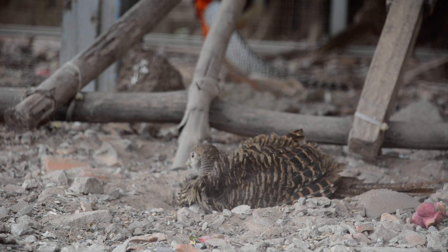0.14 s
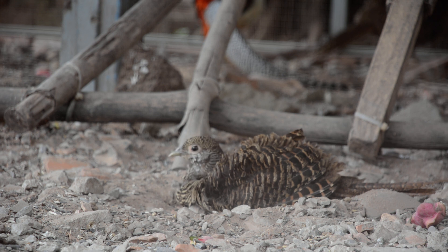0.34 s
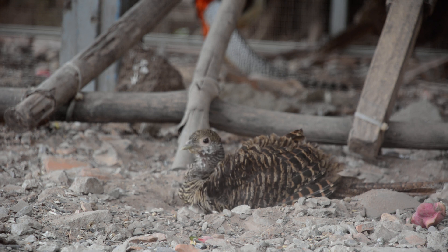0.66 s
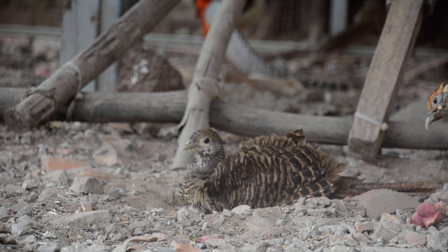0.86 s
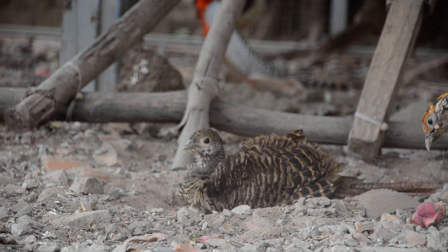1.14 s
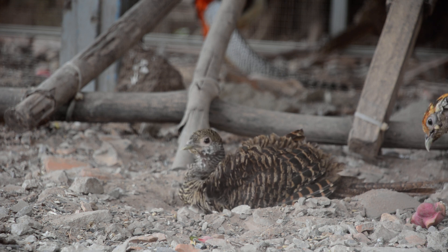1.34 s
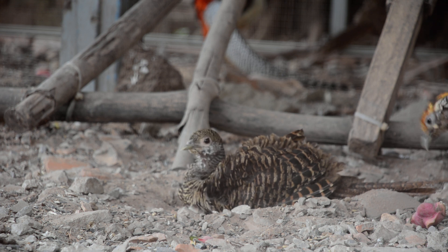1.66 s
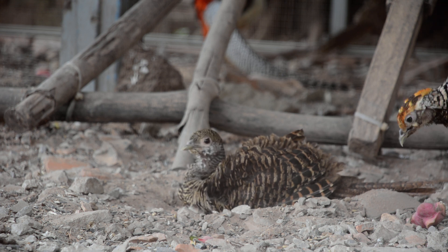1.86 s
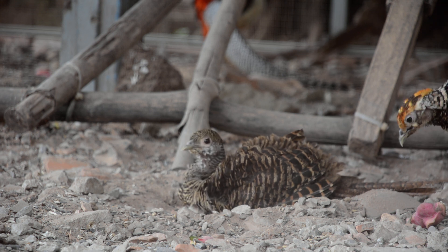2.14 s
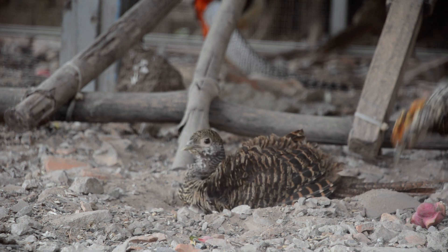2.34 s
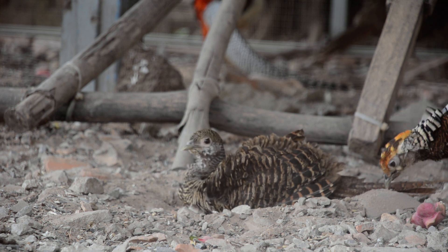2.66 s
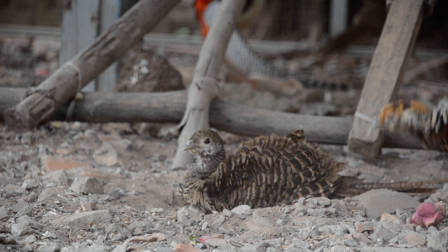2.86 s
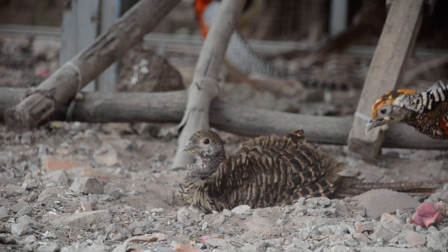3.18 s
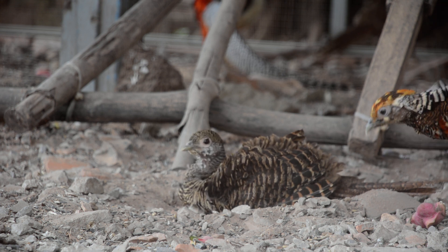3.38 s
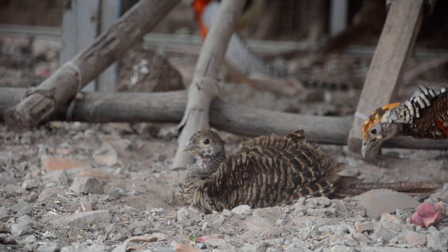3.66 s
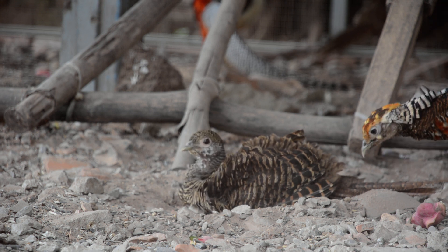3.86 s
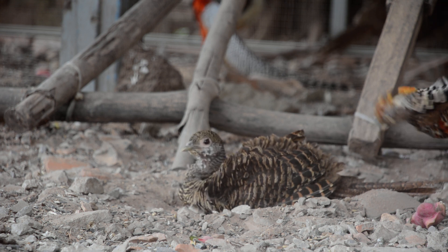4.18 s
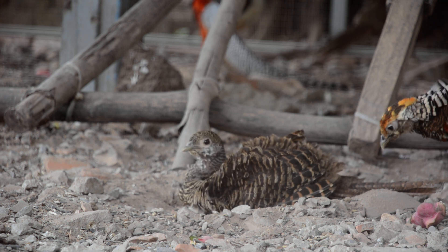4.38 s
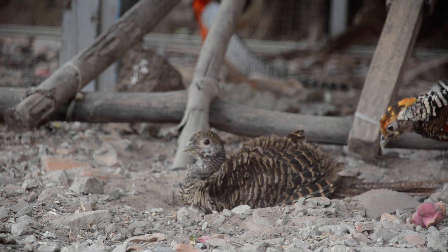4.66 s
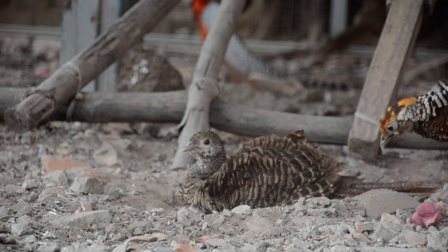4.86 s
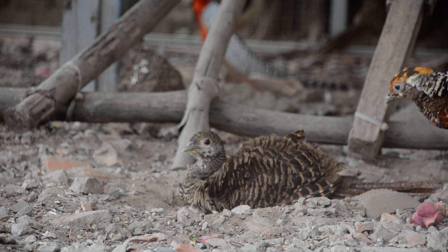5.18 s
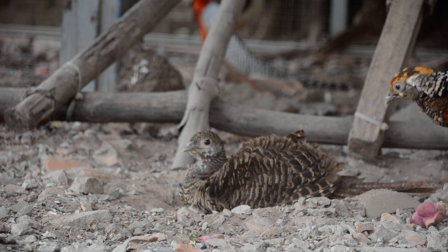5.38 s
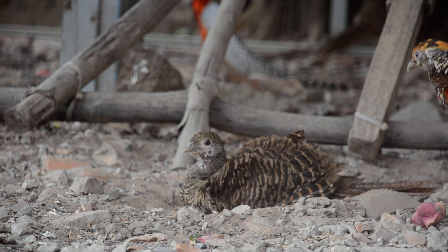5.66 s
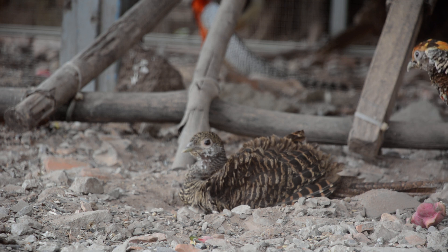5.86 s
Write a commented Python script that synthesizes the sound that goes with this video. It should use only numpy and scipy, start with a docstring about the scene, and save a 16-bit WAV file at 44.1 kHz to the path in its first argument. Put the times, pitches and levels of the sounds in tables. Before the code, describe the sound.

Birds screech, squawk and whistle in an outdoor enclosure, their overlapping calls echoing lightly, with a few gravel ticks.

```python
"""Screeching birds in an outdoor aviary

Parrot-like birds screech a little way off, each a stack of partials on a fast trill near 2 kHz.
Shrill, hoarse and piping calls and pure whistles overlap them, all echoing off walls and sheds.
Behind them the flock rasps, clicks shaped by throat and beak, over a dull murmur of the surroundings.
Close by, gravel ticks in bursts of bright noise and small knocks ring."""
import sys
import numpy as np
from scipy import signal
from scipy.fft import rfft, irfft
from scipy.io import wavfile
from scipy.ndimage import uniform_filter1d

SR = 44100
rng = np.random.default_rng(int(sys.argv[2]) if len(sys.argv) > 2 else 0)


def file_out(sig):
    """Save sig as 16-bit WAV at sys.argv[1]."""
    # one column per channel
    cols = np.atleast_2d(sig).T
    # limit, then scale
    lim = np.clip(cols, -1, 1)
    pcm = np.round(lim * 32767).astype(np.int16)
    wavfile.write(sys.argv[1], SR, pcm)


N = 265482

# One curve per screech. Each row: time in seconds, pitch in Hz, second partial's level in dB,
# trill depth as a share of the pitch.
SCREECH_CURVES = [
    [(0.11, 2183, -46, 0.054), (0.22, 2090, -36.5, 0.03), (0.28, 1947, -33.5, 0.009),
     (0.36, 1923, -33, 0.0062), (0.42, 1952, -43, .01), (0.52, 1960, -43.5, .009)],
    [(0.53, 2015, -43, 0.037), (0.56, 2015, -34.5, 0.039), (0.62, 2037, -34, 0.022),
     (0.68, 2017, -35, 0.0055), (0.74, 2015, -39, 0.011)],
    [(0.74, 2172, -39, 0.043), (0.77, 2160, -34, .034), (0.85, 2144, -32, 0.03), (0.97, 2046, -29.5, 0.036)],
    [(0.97, 2036, -33.5, 0.049), (1.05, 2023, -30, 0.024), (1.2, 2034, -30.5, .033),
     (1.36, 2022, -35.5, .015), (1.4, 2010, -40, 0.013), (1.45, 1960, -44.5, .018)],
    [(1.47, 2025, -39, 0.074), (1.57, 2100, -30, 0.059), (1.63, 2023, -34.5, 0.046),
     (1.7, 2140, -36.5, .047), (1.85, 2165, -41, 0.045)],
    [(1.85, 2146, -37, 0.062), (1.89, 2090, -36.5, 0.043), (1.94, 2020, -36, 0.016),
     (2.05, 2020, -43, .013), (2.09, 2054, -42.5, 0.018)],
    [(2.09, 2040, -36, 0.051), (2.12, 2110, -33.5, .039), (2.2, 2084, -33, 0.029),
     (2.3, 2037, -41.5, 0.011), (2.39, 1930, -41.5, 0.02)],
    [(2.39, 1947, -39.5, 0.039), (2.49, 2033, -36, 0.04), (2.54, 2032, -41.5, 0.032),
     (2.58, 2000, -49, .03), (2.7, 2003, -56.5, .024)],
    [(2.87, 1650, -64, 0.092), (2.95, 2080, -47.5, .06), (2.98, 2174, -45, 0.047), (3.0, 2076, -36, 0.0055),
     (3.015, 1922, -39.5, .005), (3.04, 1900, -44, .005)],
    [(3.03, 2050, -40.5, 0.037), (3.06, 1977, -41.5, 0.055), (3.11, 1983, -51, 0.055),
     (3.16, 1942, -48, 0.051), (3.22, 1890, -60, 0.049)],
    [(3.59, 2117, -44.5, 0.019), (3.64, 2150, -36.5, 0.026), (3.69, 2240, -32.5, 0.019),
     (3.8, 2230, -30.5, 0.013), (3.86, 2245, -39, 0.013), (3.97, 2247, -48, 0.014), (4.02, 2260, -55, .013)],
    [(4.41, 1894, -46, 0.057), (4.44, 1890, -35.5, .046), (4.48, 1826, -32, 0.026),
     (4.53, 1824, -31.5, 0.0094), (4.57, 1820, -37, 0.018), (4.62, 1863, -46, 0.032)],
    [(0.0, 2035, -49, .015), (0.08, 2050, -53, .015), (0.15, 2080, -52, .02)],
]
# Tone of each screech. Each row: first partial at start and end in dB, third partial in dB, in-between
# lines in dB, their entry in seconds, tilt at start and end in dB per octave, hiss in dB.
SCREECH_TONES = [(-4, -7, -8, -15, .2, -4.5, 2.5, -21), (-9, -4.5, -7.5, -8.5, 0.094, 3.5, 6, -16),
                 (-3, -4.5, -7, -10, .15, 1, -4.5, -23), (-4, -9, -9, -9.5, 0.072, -2.5, -2.5, -18.5),
                 (-4.5, -20, -10.5, -8, 0.13, 0, -3, -14), (-9.5, -4, -9.5, -7, .07, -2.5, 1.5, -15),
                 (-7, -5, -11.5, -7, .07, -2.5, -2, -19), (-4.5, -12, -8.5, -12, .12, 5.5, 3, -13.5),
                 (-11, -10, -11, -18, .16, 11.5, 11, -14), (-7, -6, -11, -13, .06, 5, -3, -14),
                 (-11, -25, -18, -8, .08, 5.5, -11, -25), (-17, -2.5, -18, -7.5, .1, 2, 0.5, -19),
                 (2.5, 1, -9, -10, .02, 0, -2, -20)]
# Harmonics, and the lines between them. Each row: multiple of the pitch, level in dB.
SCREECH_PARTIALS = [(2, 0), (4, -13.5), (5, -22.5), (6, -43)]
BETWEEN_LINES = [(.5, -27.5), (1.5, 2), (2.5, -12), (3.5, -17), (4.5, -12.5)]


def screeches():
    """The pitch trills in quick upward sweeps, each louder in its middle; steadier lines lie between."""
    trill_hz, entry_rise_db, entry_ease_s = 77.6, 17, 0.016
    out = np.zeros((2, N))
    for rows, tone in zip(SCREECH_CURVES, SCREECH_TONES):
        first_db, first_end_db, third_db, between_db, entry_s, tilt, tilt_end, _ = tone
        where, s = span(rows)
        size = len(s)
        pitch, db, depth = in_time(rows, s)
        held_back_db = entry_rise_db / (1 + np.exp((s - s[0] - entry_s) / entry_ease_s))
        between_db = between_db - held_back_db + 2 * drift(8, size)   # fade in, then flicker
        first_db = np.linspace(first_db, first_end_db, size)
        tilt = np.linspace(tilt, tilt_end, size)
        cycle = np.cumsum(trill_hz * (1 + 0.091 * drift(32, size))) / SR + rng.random()
        sweep = signal.sawtooth(2 * np.pi * cycle, .8) + 0.403 * drift(322, size)
        throb_db = -60 * depth * np.cos(2 * np.pi * cycle + 0.71)
        turns = np.cumsum(pitch * (1 + depth * sweep)) / SR
        steady_turns = np.cumsum(pitch * (1 + 0.18 * depth * sweep)) / SR
        upper = [(k, level + tilt * np.log2(k / 2)) for k, level in SCREECH_PARTIALS + [(3, third_db)]]
        for k, level in [(1, first_db)] + upper:
            out[:, where] += scattered_partial(k * turns, db + level + throb_db, k * pitch.mean(),
                                               fade_hz=40 + 40 * min(k, 2), scatter=.7)
        for k, level in BETWEEN_LINES:
            out[:, where] += scattered_partial(k * steady_turns, db + between_db + level,
                                               k * pitch.mean(), fade_hz=80, scatter=.85)
    return out


# Shrill calls, lone lines within a screech, and hoarse far calls. Each row: start, peak and end in
# seconds, start and end pitch in Hz, level in dB, sag after the peak in dB.
SHRILL_CALLS = [(1.5, 1.53, 1.74, 2270, 2373, -37.5, 5), (1.63, 1.682, 1.83, 5500, 5570, -33.5, 7.5),
                (3.56, 3.612, 3.8, 5410, 5480, -37, 1)]
LONE_LINES = [(3.75, 3.775, 4.03, 7030, 7005, -41, 20), (3.72, 3.732, 3.96, 1119, 1200, -48.5, 10)]
HOARSE_CALLS = [(3.3, 3.37, 3.56, 2910, 2915, -47, 4.5), (3.5, 3.58, 4.4, 2910, 2900, -53, 7),
                (4.06, 4.1, 4.25, 3033, 2900, -44.5, 12), (4.24, 4.3, 4.5, 2803, 3020, -51, -2),
                (4.47, 4.5, 4.72, 2880, 2805, -47.5, -1.5), (4.6, 4.67, 4.69, 3010, 3040, -44, 7),
                (5.1, 5.172, 5.36, 3533, 3380, -45.5, 2), (5.81, 5.864, 5.94, 3307, 3480, -43.5, 11)]
# Their timbres. Each row: multiple of the pitch, level in dB.
SHRILL_VOICE = [(.5, -19.5), (1, 0.5), (1.5, -45), (2, -20)]
HOARSE_VOICE = [(.5, -10), (1, 3.5), (1.5, -6.5), (2, -14.5), (2.5, -25), (3, -22)]


def rough_calls():
    """Fast pitch jitter and heavy scatter give these voices their grain."""
    shrill = calls(SHRILL_CALLS, SHRILL_VOICE, wobble=0.0262, wobble_hz=260, fade_hz=154, scatter=0.51)
    lone = calls(LONE_LINES, [(1, 0)], wobble=0.0097, wobble_hz=150, fade_hz=60, scatter=0.67)
    hoarse = calls(HOARSE_CALLS, HOARSE_VOICE, wobble=0.063, wobble_hz=248, fade_hz=58, scatter=1)
    return shrill + lone + hoarse


# Piping notes. Each row: start, peak and end in seconds, start and end pitch in Hz, level in dB,
# sag in dB, trim of the upper partials in dB.
PIPING_CALLS = [(4.6, 4.63, 4.67, 3100, 3094, -36.5, -2, -20),
                (4.66, 4.685, 4.85, 3045, 3088, -33.5, 12.5, -18),
                (4.89, 4.928, 5.1, 3155, 3160, -45, 11, -1), (5.36, 5.385, 5.24, 3120, 3100, -44, 4, -14),
                (5.47, 5.5, 5.56, 3120, 3073, -44.5, -1.5, -8.5),
                (5.57, 5.59, 5.5, 3100, 3100, -48, 6, -12), (5.67, 5.69, 5.8, 3154, 3136, -44.5, 3, -4.5),
                (5.82, 5.868, 6.07, 3120, 3050, -43, 7, -6)]
# Their timbre. Each row: multiple of the pitch, level in dB.
PIPING_VOICE = [(.5, -34), (1, 1), (1.5, 2), (2, -12.5), (2.5, -14), (3, -17.5)]


def piping():
    """A run of short, nearly steady notes around 3.1 kHz."""
    return calls(PIPING_CALLS, PIPING_VOICE, wobble=0.0057, wobble_hz=59.6, fade_hz=24.2, scatter=0.51)


# Whistles in three registers. Each row: start, peak and end in seconds, start and end pitch in Hz,
# level in dB, sag in dB.
HIGH_NOTES = [(4.855, 4.895, 4.93, 2775, 2770, -32.5, 3), (4.904, 4.912, 4.92, 2750, 2735, -22, 12),
              (4.921, 4.928, 4.94, 2750, 2790, -24, 11), (4.955, 4.962, 4.975, 2763, 2790, -29, 9),
              (4.975, 4.99, 5.09, 2767, 2760, -32.5, 7), (5.09, 5.14, 5.19, 2765, 2730, -43, 5)]
MID_NOTES = [(4.805, 4.836, 5.0, 2340, 2290, -42, 8.6)]
LOW_NOTES = [(5.14, 5.172, 5.28, 1200, 1255, -43, 3.5), (5.21, 5.27, 5.36, 1374, 1413, -39, -5.5),
             (5.365, 5.425, 5.53, 1447, 1456, -33.5, -1), (5.53, 5.566, 5.55, 1435, 1487, -34.5, 7),
             (5.6, 5.618, 5.68, 1465, 1442, -34, 3.5), (5.69, 5.72, 5.855, 1460, 1451, -38.5, -2.5),
             (5.85, 5.872, 6.06, 1486, 1400, -34.5, 4), (5.89, 5.905, 5.95, 1450, 1430, -38.5, 8)]
# Their timbres. Each row: multiple of the pitch, level in dB.
HIGH_VOICE = [(1, 0), (2, -24), (3, -38)]
MID_VOICE = [(1, 0.5), (2, -25), (3, -36), (4, -24), (5, -28)]
LOW_VOICE = [(1, -0.5), (2, -18)]


def whistles():
    """Almost pure gliding tones with faint overtones."""
    high = calls(HIGH_NOTES, HIGH_VOICE, wobble=0.0033, wobble_hz=40, fade_hz=25, scatter=0.18)
    middle = calls(MID_NOTES, MID_VOICE, wobble=0.015, wobble_hz=151, fade_hz=40, scatter=0.69)
    low = calls(LOW_NOTES, LOW_VOICE, wobble=.008, wobble_hz=40, fade_hz=35, scatter=.35)
    return high + middle + low


# The flock's steady bed. Each row: time in seconds, throat level in dB, hiss level in dB.
FLOCK_BED = [(0.0, -51, -54.5), (0.1, -51.5, -64), (0.3, -61, -60), (0.45, -54.5, -60), (0.75, -62, -60),
             (1.4, -53.5, -64), (1.9, -54.5, -64), (2.4, -56, -52), (2.65, -54.5, -65), (2.85, -61.5, -69),
             (3.3, -58, -67), (3.65, -52.5, -57), (4.1, -51.5, -66.5), (4.36, -50, -64.5), (4.8, -51, -71),
             (5.03, -51.5, -70), (5.4, -50, -66.5), (6.02, -53, -68)]
# Raucous squawks. Each row: peak in seconds, throat and hiss in dB, rise and fall in seconds per 10 dB.
SQUAWKS = [(0.17, -46.5, -50.5, 0.056, 0.1), (0.52, -52.5, -60, 0.17, 0.2), (0.97, -50.5, -45, 0.13, 0.06),
           (1.11, -43.5, -43.5, 0.067, 0.23), (1.479, -44.5, -49.5, 0.043, .12),
           (1.64, -51, -43.5, 0.054, 0.19), (1.74, -50.5, -57, .05, .15), (2.01, -51.5, -53, .04, .2),
           (2.43, -53, -55, .06, 0.1), (2.94, -50, -59, 0.055, 0.13), (3.03, -51, -53.5, .06, 0.2),
           (3.66, -51, -60, 0.073, .1), (3.77, -45.5, -46, .04, .1), (3.85, -47, -49.5, .05, .07),
           (4.45, -46, -48.5, 0.072, 0.09), (4.52, -56, -47.5, 0.033, 0.02),
           (4.63, -50.5, -51.5, 0.048, .1), (5.17, -45, -53, 0.063, 0.23), (5.53, -52, -62, 0.054, .06),
           (5.86, -46, -52.5, 0.052, 0.24)]
# EQ of the rasp and of the hiss. Each row: frequency in Hz, gain in dB.
THROAT_EQ = [(700, -12), (1200, -4.5), (2000, -3), (2600, 1.5), (3500, 3.5), (4500, -7.5), (6000, -25),
             (9000, -71)]
HISS_EQ = [(3000, -45), (4500, -1), (5500, 1.5), (7000, 0.5), (9000, -4.5), (11000, -11.5), (13000, -30.5),
           (15500, -44)]


def flock(s):
    """Far birds through two ranges of throat and beak; squawks swell out, and each screech adds hiss."""
    throat_power, hiss_power = (amp(db) ** 2 for db in in_time(FLOCK_BED, s))
    for peak, throat_db, hiss_db, rise, fall in SQUAWKS:
        swell_db = -10 * np.where(s < peak, (peak - s) / rise, (s - peak) / fall)
        throat_power += amp(throat_db + swell_db) ** 2
        hiss_power += amp(hiss_db + swell_db) ** 2
    for rows, (*_, hiss_db) in zip(SCREECH_CURVES, SCREECH_TONES):
        sounding = (s > rows[0][0]) & (s < rows[-1][0])
        hiss_power += amp(in_time(rows, s)[1] + hiss_db) ** 2 * sounding
    birds = far_birds()
    rasp = coloured(birds * amp(0.84 * drift(82, N)), THROAT_EQ, 2300, 2778)
    hiss = coloured(birds * amp(0.5 * drift(90, N)), HISS_EQ, 6650, 7790)
    return np.sqrt(throat_power) * rasp + np.sqrt(uniform_filter1d(hiss_power, size=441)) * hiss


def far_birds(count=6, gain_db=-3):
    """Each bird clicks once a cycle at a rough pitch, and takes a new pitch and level for every call."""
    out = rng.standard_normal((2, N))   # the blur of birds too far off to tell apart
    for bird in range(count):
        ends = np.cumsum(rng.uniform(.08, .25, size=80))
        pitch, level = rng.uniform(1100, 2500, size=81), rng.random(size=81) ** 3
        call = np.searchsorted(ends, np.arange(N) / SR)
        turns = np.cumsum(pitch[call] * (1 + .025 * drift(120, N))) / SR
        clicks = np.diff(np.floor(turns), prepend=0)
        voice = (clicks - clicks.mean()) / clicks.std() * uniform_filter1d(level[call], size=900)
        side = (-1) ** bird * np.roll(voice, 300 + 70 * bird)
        out += amp(gain_db) * np.array([voice, side])
    return out


# Gravel ticks. Each row: start in seconds, level in dB, band centre in Hz, leftward pan in dB.
TICKS = [(0.3331, -44, 7600, -1), (0.5332, -45, 6200, -1.5), (1.479, -52, 7400, -1),
         (2.802, -57, 8500, 0.5), (3.2445, -52, 9500, 3), (4.0692, -51, 7000, -0.5), (4.187, -45, 7800, 0),
         (5.0953, -49, 9000, 4), (5.2664, -47, 6300, -0.5), (5.3053, -51, 7400, 3), (5.409, -53, 8000, 0.5),
         (5.6136, -34, 7600, 0.5)]


def gravel(snap_t60_s=.006, scuff_t60_s=0.17):
    """Each tick is a snap of bright noise with a softer scuff trailing it."""
    out, t = np.zeros((2, N + SR)), np.arange(SR // 8) / SR
    for start, db, hz, pan_db in TICKS:
        band = signal.butter(3, [.6 * hz, min(1.5 * hz, 19000)], "band", fs=SR, output="sos")
        envelope = amp(db - 60 * t / snap_t60_s) + amp(db - 13 - 60 * t / scuff_t60_s)
        burst = signal.sosfilt(band, rng.standard_normal((2, len(t)))) * envelope
        left, right = burst * amp([[pan_db / 2], [-pan_db / 2]])
        out[:, round(start * SR):][:, :len(t)] += [left + right, left - right]
    return out[:, :N]


# Small knocks. Each row: start in seconds, level in dB, pitch in Hz.
KNOCKS = [(0.132, -43, 1105), (0.469, -45, 864), (1.408, -42.5, 1385), (1.876, -45, 1202),
          (2.258, -53, 1180), (2.589, -45, 668), (2.812, -43.5, 1188)]


def knocks(attack_s=0.0018, t60_s=0.25):
    """Each knock rings dully at one pitch, dead centre."""
    out, t = np.zeros((2, N + SR)), np.arange(SR // 8) / SR
    for start, db, hz in KNOCKS:
        envelope = amp(db - 60 * t / t60_s) * np.minimum(1, t / attack_s)
        out[0, round(start * SR):][:len(t)] += np.sin(2 * np.pi * hz * t) * envelope
    return out[:, :N]


def echoes(x, t60_s=.4, wet_db=-10):
    """Diffuse returns from walls and sheds, with a softened top."""
    t = np.arange(SR // 2) / SR
    tail = signal.lfilter([1], [1, -.5], rng.standard_normal((2, len(t)))) * amp(-60 * t / t60_s)
    tail *= amp(wet_db) / np.sqrt(np.sum(tail[0] ** 2))
    return np.array([signal.fftconvolve(x[k], tail[k])[:N] for k in range(2)])


# Fader ride of the murmur. Each row: time in seconds, level in dB between 300 and 800 Hz.
MURMUR_LEVEL = [(0.0, -53), (0.2, -53), (0.3, -55.5), (2.5, -56.5), (2.8, -53), (2.95, -57.5), (5.9, -62.5),
                (6.02, -56)]
# EQ of the murmur and of the far rumble. Each row: frequency in Hz, gain in dB.
MURMUR_EQ = [(120, -37), (220, -11), (400, -4.5), (900, -7), (1500, -8.5), (2500, -24.5), (4500, -47),
             (9000, -27.5), (15500, -43)]
RUMBLE_EQ = [(15, -52), (25, -56), (65, 2.5), (81, 1), (156, 3.5), (200, -3), (231, -3), (260, -10),
             (340, -20), (570, -120)]


def murmur(s, rumble_db=-62):
    """Smooth far noise over a rumble that partly follows its level."""
    noise = rng.standard_normal((2, 2, N))
    db = in_time(MURMUR_LEVEL, s)[0]
    rumble = amp(rumble_db + 0.65 * (db - db.mean())) * coloured(noise[1], RUMBLE_EQ, 60, 205)
    return rumble + amp(db) * coloured(noise[0], MURMUR_EQ, 300, 800)


def calls(notes, partials, wobble, wobble_hz, fade_hz, scatter):
    """A bird's voice: partials on one pitch that wobbles at random, by the share `wobble`."""
    out = np.zeros((2, N))
    for note in notes:
        rows = call_curve(*note)
        where, s = span(rows)
        pitch, db, *upper_db = in_time(rows, s)
        turns = np.cumsum(pitch * (1 + wobble * drift(wobble_hz, len(s)))) / SR
        for k, partial_db in partials:
            level = db + partial_db + (sum(upper_db) if k > 1 else 0)
            out[:, where] += scattered_partial(k * turns, level, k * pitch.mean(), fade_hz, scatter)
    return out


def call_curve(start, peak, end, start_hz, end_hz, db, sag_db, *upper_db):
    """One call swells, sags and releases on a straight glide; a negative sag keeps it growing."""
    swell_db, release_db, release_share = 13, 12, 0.22
    times = [start, peak, end - release_share * (end - peak), end]
    levels = [db - swell_db, db, db - sag_db, db - sag_db - release_db]
    pitches = np.interp(times, [start, end], [start_hz, end_hz])
    return [(*point, *upper_db) for point in zip(times, pitches, levels)]


# Stereo width. Each row: frequency in Hz, side level against mid in dB.
WIDTH = [(60, -51), (130, -20.5), (290, -13), (640, -8.5), (1410, -15.5), (3100, -14), (6820, -8),
         (15000, 2.5)]


def scattered_partial(turns, db, hz, fade_hz, scatter):
    """Scattered paths make each partial fade by itself; `scatter` is their share of the mid's power."""
    size = len(turns)
    paths = [(drift(fade_hz, size) + 1j * drift(fade_hz, size)) / np.sqrt(2) for _ in range(2)]
    mid = np.sqrt(1 - scatter) + np.sqrt(scatter) * paths[0]
    side = paths[1] * amp(at_hz(WIDTH, hz))
    ramp = np.minimum(1, np.arange(size) / (0.0013 * SR))
    envelope = np.sqrt(2) * amp(db) * np.minimum(ramp, ramp[::-1])
    return np.real(envelope * np.exp(2j * np.pi * (turns + rng.random())) * [mid, side])


def coloured(x, eq, low_hz, high_hz):
    """Applies an EQ and the stereo width; the mid gets rms 1 between the two frequencies."""
    hz = np.fft.rfftfreq(N, 1 / SR)
    spectrum = rfft(x) * amp(at_hz(eq, hz))
    spectrum[1] *= amp(at_hz(WIDTH, hz))
    power = 2 * np.sum(abs(spectrum[0, (hz > low_hz) & (hz < high_hz)]) ** 2) / N ** 2
    return irfft(spectrum, N) / np.sqrt(power)


def drift(hz, size):
    """Random modulation with spread 1: noise twice through a one-pole low-pass."""
    pole = np.exp(-2 * np.pi * hz / SR)
    slow = signal.lfilter([1], [1, -2 * pole, pole * pole], rng.standard_normal(size + 4000))[4000:]
    return slow * (1 - pole * pole) ** 1.5 / np.sqrt(1 + pole * pole)


def amp(db):
    """Gain of a level in dB."""
    return 10 ** (np.asarray(db) / 20)


def at_hz(points, hz):
    """Reads an EQ curve on a log-frequency axis."""
    point_hz, db = np.transpose(points)
    return np.interp(np.log(np.maximum(hz, 1)), np.log(point_hz), db)


def in_time(rows, s):
    """The columns of a curve at the times s."""
    times, *columns = np.transpose(rows)
    return [np.interp(s, times, column) for column in columns]


def span(rows):
    """A call's slice of the timeline and its sample times in seconds."""
    first, stop = round(rows[0][0] * SR), min(round(rows[-1][0] * SR), N)
    return slice(first, stop), np.arange(first, stop) / SR


def scene():
    """Mixes the layers as mid and side, then turns them into left and right."""
    s = np.arange(N) / SR
    birds = screeches() + rough_calls() + piping() + whistles()
    mid, side = birds + echoes(birds) + flock(s) + murmur(s) + gravel() + knocks()
    return np.array([mid + side, mid - side])


def record(dry, low_cut_hz=48, high_cut_hz=15650):
    """The microphone drops the deepest bass; the top is cut steeply."""
    dry = signal.sosfilt(signal.butter(3, low_cut_hz, "high", fs=SR, output="sos"), dry)
    return signal.sosfilt(signal.ellip(12, .5, 80, high_cut_hz, fs=SR, output="sos"), dry)


dry = scene()
out = record(dry)
file_out(out)
```